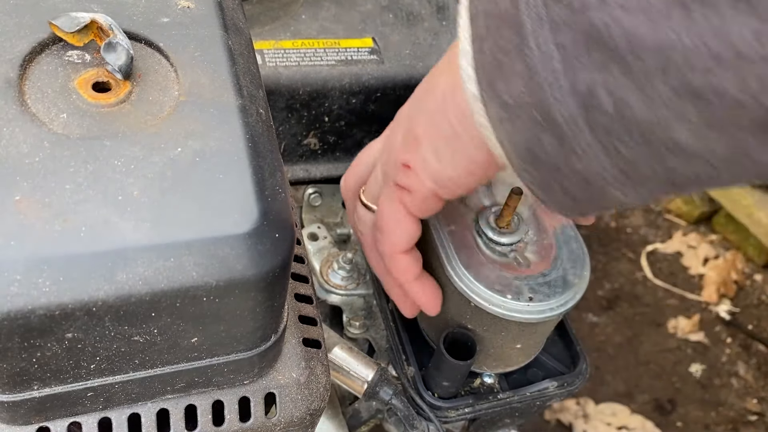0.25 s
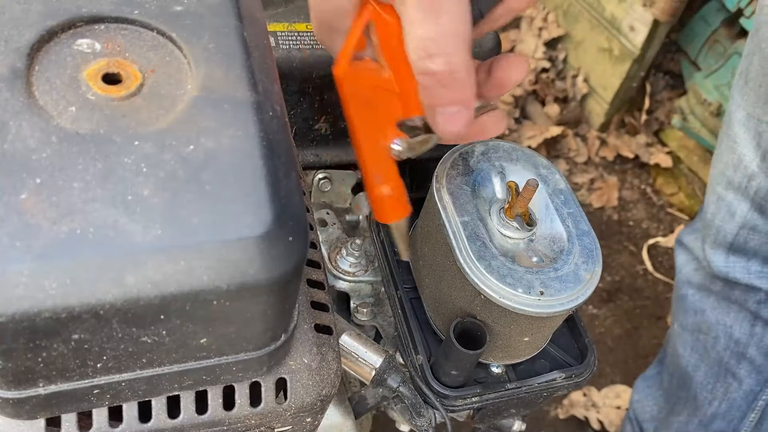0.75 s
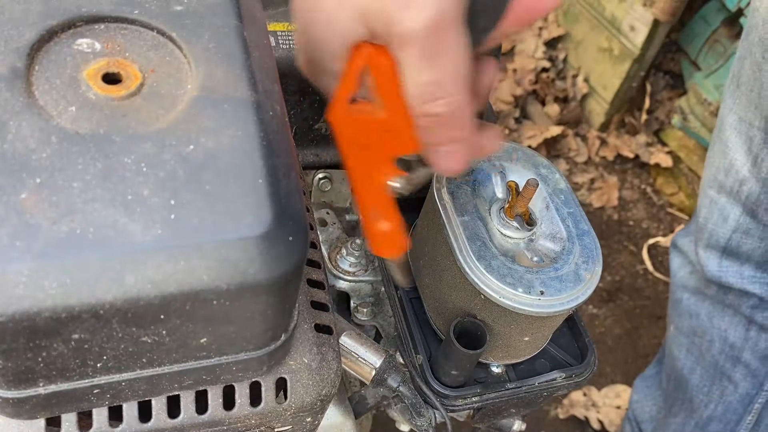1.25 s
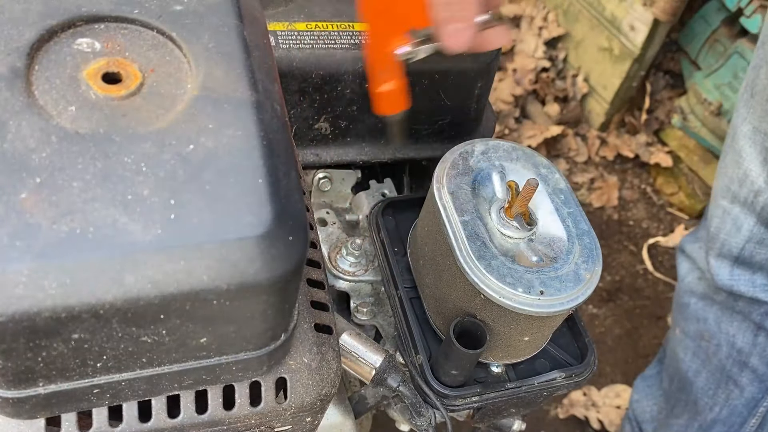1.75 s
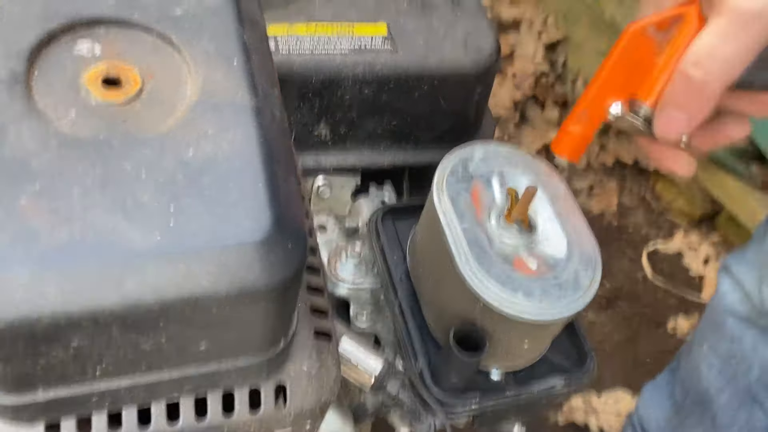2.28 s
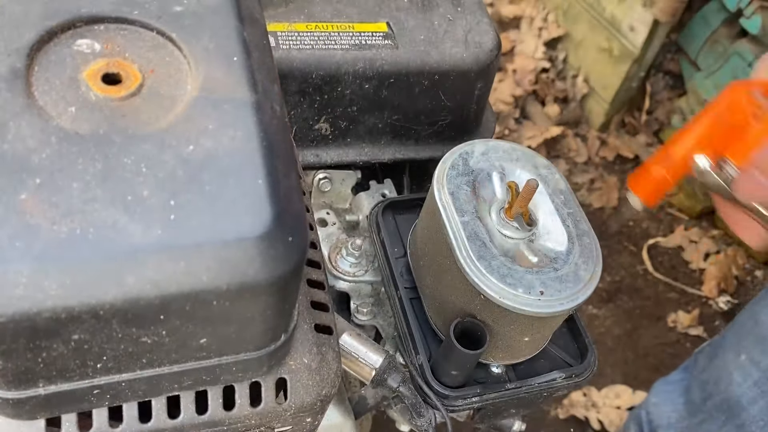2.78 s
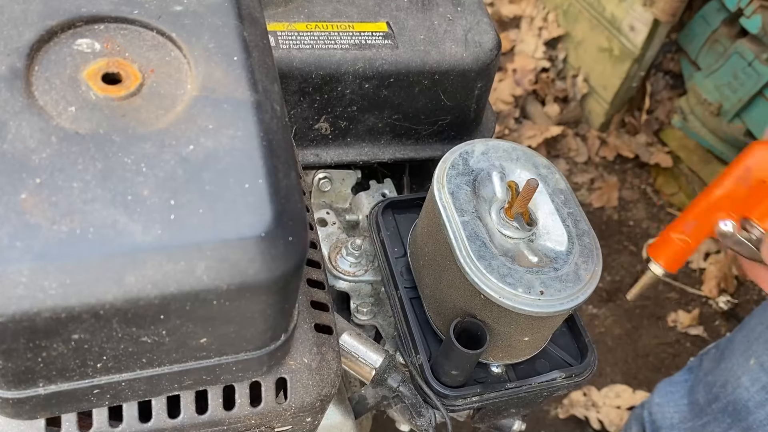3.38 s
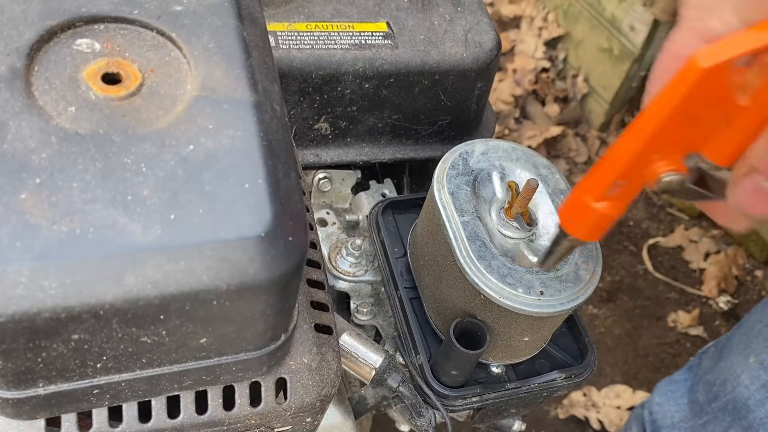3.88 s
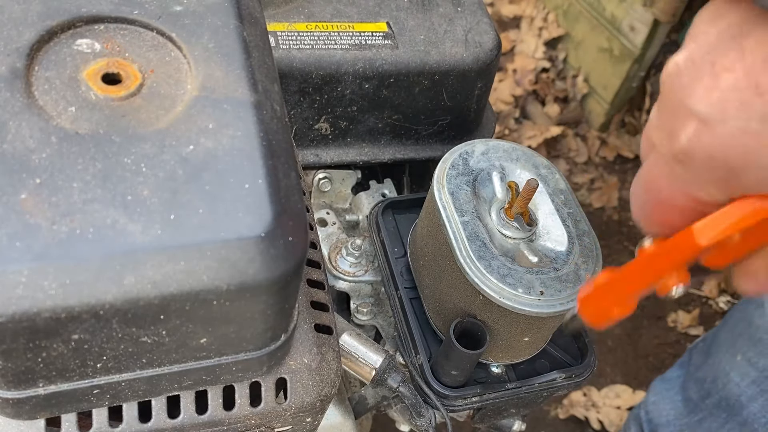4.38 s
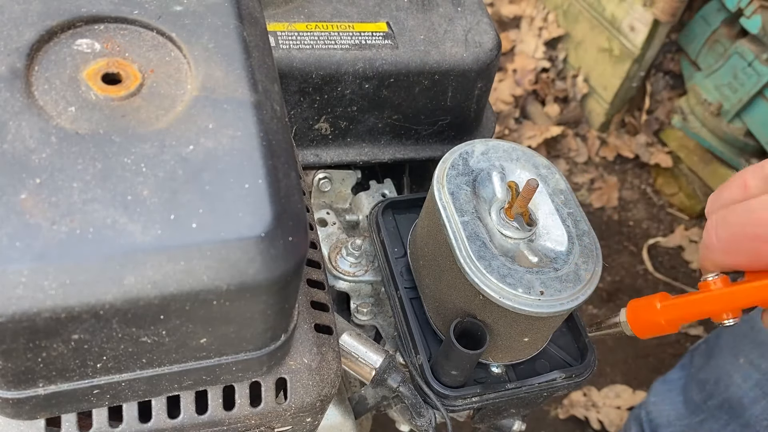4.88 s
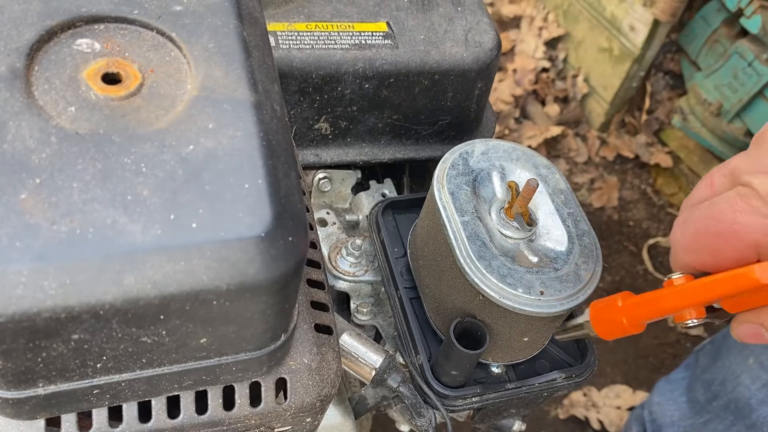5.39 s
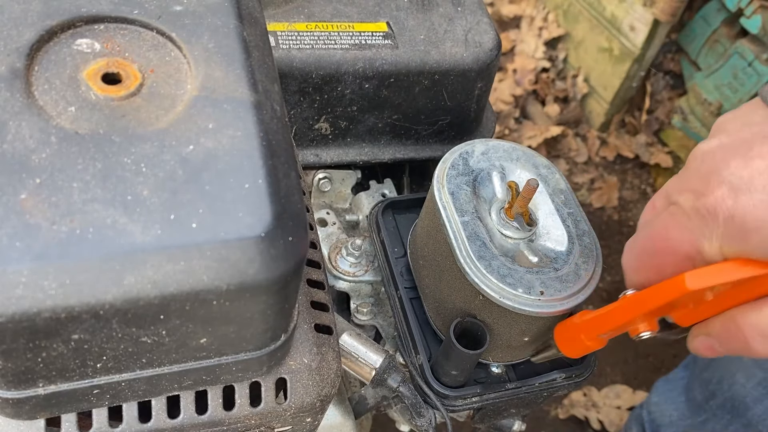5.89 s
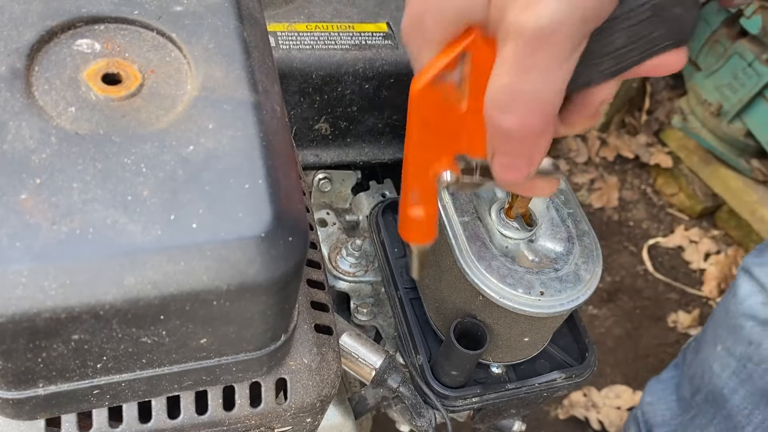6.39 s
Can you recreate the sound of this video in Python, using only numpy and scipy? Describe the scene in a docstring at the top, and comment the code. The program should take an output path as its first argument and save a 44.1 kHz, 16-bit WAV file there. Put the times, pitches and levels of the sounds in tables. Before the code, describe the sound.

Outdoors and very close, cloth brushes the microphone with rumble, low thumps, a finger scrape and small metallic taps. Then a compressed-air blow gun fires twenty-two quick bright blasts about four per second, each starting and stopping abruptly. The hiss shifts in colour as it strikes edges and hollows, with short airy hoots over gaps, faint leaks between bursts and soft puffs of stray air.

```python
"""A compressed-air blow gun, outdoors and close to the microphone, cleans a small engine's air filter
in twenty-two quick blasts: each trigger pull frees a bright noise jet that also roars on metal edges and
in the hollows of the housing. A sleeve first brushes past the microphone with a rustle and a low rumble.
Hand and gun tap, a finger scrapes the lid, gaps hoot under the jet, the valve hisses as it leaks,
and stray air thumps on the microphone. Faint scatter from the engine and the yard, and quiet air, lie behind."""
import sys
import numpy as np
from scipy import signal
from scipy.fft import rfft, irfft
from scipy.io import wavfile

SR = 44100
rng = np.random.default_rng(int(sys.argv[2]) if len(sys.argv) > 2 else 0)


def materialize(psi):
    """Save the field psi as 16-bit PCM at rate SR to the path in sys.argv[1].

    A 1-D psi becomes a single channel; in a 2-D psi each row is a channel.
    """
    bounded = np.clip(np.atleast_2d(psi).T, -1, 1)
    quanta = np.round(bounded * 32767).astype(np.int16)
    wavfile.write(sys.argv[1], SR, quanta)


N = 293265
TIME = np.arange(N) / SR
HZ = np.maximum(np.fft.rfftfreq(N, 1 / SR), 1)   # kept above zero for logarithms


def from_db(db):
    """Decibels to gain."""
    return 10 ** (np.asarray(db) / 20)


def rms_one(x):
    """Scale to unit rms."""
    return x / np.sqrt(np.mean(x ** 2) + 1e-20)


def in_time(rows):
    """Interpolate each column of a table over time; the first column is the time."""
    s, *columns = np.transpose(rows)
    return [np.interp(TIME, s, column) for column in columns]


def swell(middle_s, half_s, order=2):
    """A smooth hump of height 1; a higher order flattens its top."""
    return np.exp(-np.minimum(np.abs((TIME - middle_s) / half_s) ** order, 50))


def butter(x, hz, kind, order=2):
    """Low-pass or high-pass filter."""
    sos = signal.butter(order, min(hz, .45 * SR), kind, fs=SR, output="sos")
    return signal.sosfilt(sos, x)


def drift(rate_hz):
    """A random wander of unit rms, mostly slower than the given rate."""
    return rms_one(irfft(rfft(rng.standard_normal(N)) / (1 + (HZ / rate_hz) ** 2), N))


def white(side_db):
    """Stereo white noise, mostly common to both channels, unit rms."""
    mid, side = rng.standard_normal((2, N))
    return rms_one(mid + from_db(side_db) * side * np.array([[1], [-1]]))


def coloured(spectrum, side_db):
    """Stereo noise shaped by a spectrum table, unit rms."""
    hz, db = np.transpose(spectrum)
    gain = from_db(np.interp(np.log(HZ), np.log(hz), db))
    return rms_one(irfft(rfft(white(side_db)) * gain, N))


def tone_noise(hz, width_hz, size):
    """Turbulence ringing in one resonance, unit rms."""
    off = (np.fft.rfftfreq(size, 1 / SR) - hz) / width_hz
    return rms_one(irfft(rfft(rng.standard_normal(size)) / (1 + 2 * off ** 2), size))


def moving_resonance(x, centre_hz, width_hz, size=128):
    """A broad band-pass whose centre glides, block by block; unit rms."""
    out, state, q = np.zeros_like(x), np.zeros((2, 2)), np.tan(np.pi * width_hz / SR)
    for i in range(0, N, size):
        a = [1 + q, -2 * np.cos(2 * np.pi * centre_hz[i] / SR), 1 - q]
        out[:, i:i + size], state = signal.lfilter([q, 0, -q], a, x[:, i:i + size], zi=state)
    return rms_one(out)


# Quiet outdoor air, relative density per Hz: (pitch_hz, level_db)
AIR_SPECTRUM = [(25, -15), (90, 2), (200, -2.5), (270, 1), (370, -11), (480, -4), (700, -12.5),
                (1200, -18.5), (4000, -25), (15000, -31)]


def ambience(level_db=-74.5):
    """Steady, mostly low noise of the quiet open air."""
    return from_db(level_db) * coloured(AIR_SPECTRUM, side_db=-6.5)


def tail(x, t60_s, cut_hz):
    """Diffuse scatter as decaying low-passed noise, unrelated in the two channels."""
    t = TIME[:SR]
    noise = butter(rng.standard_normal((2, SR)), cut_hz, "low", order=1)
    echo = noise * from_db(-60 * t / t60_s)
    return signal.fftconvolve(x, rms_one(echo) / np.sqrt(SR), axes=1)[:, :N]


def scatter(close):
    """Short scatter from the engine close by, and longer, duller scatter from the yard."""
    engine = from_db(-20) * tail(close, t60_s=0.18, cut_hz=7700)
    yard = from_db(-39) * tail(close, t60_s=.8, cut_hz=2300)
    return engine + yard


# The sleeve sliding by the microphone: (time_s, rustle_db, rumble_db)
SLEEVE_PASS = [(0, -41.5, -25), (0.04, -49, -39), (0.13, -37.5, -34), (0.22, -38, -33.5),
               (0.26, -39.5, -22), (0.335, -51.5, -19.5), (0.385, -53, -44), (0.48, -56, -38.5),
               (0.53, -56, -50)]
# Rustle of cloth, relative density per Hz: (pitch_hz, level_db)
CLOTH_SPECTRUM = [(100, -16), (280, -1), (380, -10), (450, 0), (620, -3.5), (850, -6.5), (1150, -7.5),
                  (1700, -8), (2900, -7.5), (5000, -11.5), (8000, -14), (12000, -16.5), (16000, -26)]
# Rumble of the moving arm, relative density per Hz: (pitch_hz, level_db)
RUMBLE_SPECTRUM = [(20, -17), (40, -7), (58, 1), (85, -3.5), (150, -20.5), (300, -38.5), (1000, -61)]


def sleeve(grain_db=2.0, rumble_gain_db=-1):
    """Cloth fibres catch and slip, and the moving arm stirs a low rumble."""
    rustle_db, rumble_db = in_time(SLEEVE_PASS)
    passing = np.interp(TIME, [.55, .6], [1, 0])
    rustle = from_db(rustle_db + grain_db * drift(206)) * coloured(CLOTH_SPECTRUM, side_db=-5.5)
    rumble = from_db(rumble_db + rumble_gain_db) * coloured(RUMBLE_SPECTRUM, side_db=-12.5)
    return passing * (rustle + rumble)


# Small taps of hand and gun: (start_s, level_db)
TAP_HITS = [(0.298, -33), (0.323, -37), (0.420, -38), (0.495, -45), (3.935, -65), (6.158, -48.5)]
# Resonances each tap rings with: (pitch_hz, level_db, t60_s)
TAP_RESONANCES = [(1897, -11.5, 0.022), (2670, -10, .022), (3060, -2, 0.015), (4700, -3.5, 0.012),
                  (7400, -12, .012), (11100, -7, 0.02)]


def taps(scuff=0.235, scuff_s=0.0016):
    """Each tap is a brief noise scuff and a short ring of damped sines."""
    out, t = np.zeros(N), TIME[:SR // 10]
    for start_s, tap_db in TAP_HITS:
        ring = np.zeros(len(t))
        for hz, level_db, t60_s in TAP_RESONANCES:
            strength = from_db(level_db + rng.normal(0, 2))   # each tap strikes a little differently
            ring += strength * np.sin(2 * np.pi * hz * t) * from_db(-60 * t / t60_s)
        rub = scuff * rng.standard_normal(len(t)) * np.exp(-t / scuff_s)
        at = int(start_s * SR)
        out[at:at + len(t)] += from_db(tap_db) * (ring / 2 + rub)
    return out


# A finger scrapes the filter lid: (start_s, decay_s, pitch_hz, width_hz, level_db)
LID_SCRAPES = [(0.0, .025, 1270, 200.7, -37), (0.13, .07, 437, 120, -48), (0.159, .06, 1130, 200, -44.5),
               (0.419, .005, 2830, 1214, -38)]


def scrapes(rise_s=.002):
    """Short rubs that excite one resonance each."""
    out, t = np.zeros(N), TIME[:SR // 3]
    for start_s, decay_s, hz, width_hz, level_db in LID_SCRAPES:
        envelope = np.exp(-t / decay_s) * (1 - np.exp(-t / rise_s))
        at = max(int(start_s * SR), 0)
        out[at:at + len(t)] += from_db(level_db) * tone_noise(hz, width_hz, len(t)) * envelope
    return out


# Puffs and bumps on the microphone: (start_s, level_db, first_pitch_hz, last_pitch_hz, decay_s)
MIC_PUFFS = [(0.003, -28, 121, 52, 0.017), (0.095, -20.5, 150, 60.5, 0.017), (0.242, -5.5, 120, 56, 0.015),
             (0.262, -13, 130, 60, 0.014), (0.292, -11.5, 160, 62, 0.014), (0.31, -10, 110, 60.4, 0.017),
             (0.327, -5.5, 125, 68.4, 0.01), (0.336, -11.5, 190, 99, 0.0076),
             (1.693, -30, 1470, 250, 0.0066), (1.703, -21, 940, 70.2, .015),
             (1.839, -41.5, 546, 64.7, 0.013), (3.528, -45.5, 300, 70, 0.011),
             (4.168, -36.5, 350, 147, 0.0094), (6.014, -34.5, 350, 90.6, 0.0062)]


def after_puffs(delay_s=.023):
    """A soft puff follows every release of the trigger; same columns as MIC_PUFFS."""
    return [(opens + held + delay_s, -54, 300.6, 72, .011) for opens, _, held, *_ in TRIGGER_PULLS]


def puffs(glide_s=0.0032, attack_cycles=.6, buffet=0.11, buffet_s=0.0021):
    """A pressure kick on the microphone: a short buffet and a thump that falls quickly in pitch."""
    out = np.zeros(N)
    for start_s, level_db, first_hz, last_hz, decay_s in [*MIC_PUFFS, *after_puffs()]:
        at = min(int(start_s * SR), N - 1)
        t = TIME[:min(SR // 4, N - at)]
        cycles = last_hz * t + (first_hz - last_hz) * glide_s * (1 - np.exp(-t / glide_s))
        thump = np.sin(2 * np.pi * cycles) * np.exp(-t / decay_s)
        noise = rms_one(butter(rng.standard_normal(len(t)), 2 * first_hz, "low"))
        gust = buffet * noise * np.exp(-t / buffet_s)
        attack = 1 - np.exp(-t * first_hz / attack_cycles)
        out[at:at + len(t)] += from_db(level_db) * (thump + gust) * attack
    return out


# Rumble of air on the microphone, relative density per Hz: (pitch_hz, level_db)
DRAUGHT_SPECTRUM = [(20, -13.5), (50, -0.5), (120, -3.5), (200, -3.5), (400, -9.5), (1000, -38)]


def draught(flow, lag_s=0.038):
    """Spent air reaches the microphone a moment after each blast and rumbles there."""
    draught_db = current_pull()[-1]
    square_gust = from_db(-26) * swell(1.718, .009)   # one gust hits the microphone squarely
    late_flow = np.interp(TIME - lag_s, TIME, flow)
    return (from_db(draught_db) + square_gust) * late_flow * coloured(DRAUGHT_SPECTRUM, side_db=-17.5)


# Trigger pulls, each aimed at another spot; levels before the flow and gains act on them:
# (opens_s, opening_time_constant_s, held_s, closing_time_constant_s, jet_db, jet_centre_hz, edge_db,
#  edge_change_over_blast_db, hollow_db, hollow_opening_change_db, hollow_closing_change_db, draught_db)
TRIGGER_PULLS = [(0.562, 0.00037, 0.064, 0.0055, -21.5, 10550.0, -25.6, 0, -34.5, 2.5, 5, -50.5),
                 (0.741, 0.0043, 0.177, 0.0065, -20, 7920.0, -21, -5.5, -40.5, 11.5, 14, -54.5),
                 (0.97, 0.0065, 0.15, 0.004, -17, 9030.0, -25.5, 3.5, -43, 11.5, 6.5, -50.0),
                 (1.186, 0.0064, 0.17, 0.012, -17.5, 8580.0, -24, 5, -41.0, 10.5, 5.5, -55.0),
                 (1.419, 0.0074, 0.15, 0.0078, -17, 8350.0, -25, -3.5, -40.5, -5, 8.5, -57.5),
                 (1.661, 0.0026, 0.152, 0.0062, -17.5, 10480.0, -26.5, 12.5, -39.5, 0.5, -8.0, -64),
                 (1.908, 0.0028, 0.17, 0.0053, -18, 10670.0, -27.5, -2, -43, 7.5, 4.5, -72),
                 (2.133, 0.0052, 0.16, 0.0063, -18, 8930.0, -32.2, -3.5, -41, -3.5, -10, -68.0),
                 (2.371, 0.0031, 0.14, 0.0051, -18.5, 10130.0, -30, 4.5, -44.0, -7.5, 5.5, -71.5),
                 (2.625, 0.0097, 0.162, 0.0086, -17.5, 10460.0, -25, 2.5, -40.0, 16.0, 9, -68.0),
                 (2.889, 0.0059, 0.17, 0.0061, -18.5, 10970.0, -22, 2.5, -29, 9.0, -5.5, -67),
                 (3.134, 0.003, 0.14, 0.0037, -18.5, 10320.0, -24.5, -1, -51, 15, -7.0, -67),
                 (3.347, 0.0052, 0.16, 0.0052, -19, 10640.0, -27, 3.5, -41.5, 6, 6.5, -55.5),
                 (3.602, 0.0032, 0.12, 0.0054, -21, 9130.0, -22, 1, -53.5, 22, 20.5, -65),
                 (4.024, 0.0033, 0.14, 0.009, -18, 10970.0, -27.5, -3.5, -49.0, 22, 19.0, -58.0),
                 (4.263, 0.0036, 0.13, 0.0044, -19.5, 11580.0, -26.5, 2.5, -40, 10.5, 7.5, -52.5),
                 (4.795, 0.004, 0.16, 0.004, -18.5, 10830.0, -22.5, 1, -44.5, 15, 6.5, -65.5),
                 (5.072, 0.0065, 0.16, 0.0038, -20.5, 11720.0, -27, 4, -36, -3.5, 1.0, -59),
                 (5.307, 0.0041, 0.19, 0.0038, -20, 10130.0, -23.5, -0.5, -41.5, 7.0, -15, -70),
                 (5.612, 0.0047, 0.16, 0.0044, -16.5, 11240.0, -27, 0.5, -49.5, 13.5, 6.5, -68.0),
                 (5.881, 0.0038, 0.19, 0.0036, -18.5, 9520.0, -23.7, 2, -35, -10.5, 5.0, -59.5),
                 (6.435, 0.0039, 0.186, 0.0059, -17.5, 9850.0, -25.5, -9, -43.5, 11.5, 15, -68)]


def current_pull():
    """The columns of TRIGGER_PULLS over time: each pull holds until halfway to the next."""
    rows = np.array(TRIGGER_PULLS)
    opens, closes = rows[:, 0], rows[:, 0] + rows[:, 2]
    halfway = (closes[:-1] + opens[1:]) / 2
    return rows[np.searchsorted(halfway, TIME)].T


def valve(seat=0.025):
    """The valve lifts off its seat, the flow swells, then dies as the trigger is let go."""
    opens, rise, held, fall, *_ = current_pull()
    lift = (1 + np.tanh((TIME - opens) / (2 * rise))) / 2
    release = (1 + np.tanh((opens + held - TIME) / (2 * fall))) / 2
    return np.maximum(lift - seat, 0) / (1 - seat) * release   # no flow until the lift clears the seat


# Air seeping through the barely open valve until the next blast: (start_s, hiss_db, whistle_db)
VALVE_LEAKS = [(0.719, -43.5, -80), (0.944, -45, -80), (1.144, -50.5, -80), (1.384, -48, -79),
               (2.587, -58.5, -58.5), (2.861, -43, -57), (3.325, -52, -50), (5.283, -55.5, -47.5),
               (5.583, -64.5, -52.5)]
# Resonances of the nozzle tube: (pitch_hz, width_hz, level_db)
NOZZLE_RESONANCES = [(2060, 44, -1), (3030, 350, -9), (3800, 400, -9)]


def seepage(ramp_s=.004):
    """A thin hiss before a blast; sometimes the nozzle tube sings briefly."""
    hiss, whistle = np.zeros((2, N))
    for start_s, hiss_db, whistle_db in VALVE_LEAKS:
        end_s = min(pull[0] for pull in TRIGGER_PULLS if pull[0] > start_s)
        gate = np.clip(np.minimum(TIME - start_s, end_s - TIME) / ramp_s + .5, 0, 1)
        hiss = hiss + from_db(hiss_db) * gate
        whistle = whistle + from_db(whistle_db) * gate
    tube = rms_one(sum(from_db(db) * tone_noise(hz, width, N) for hz, width, db in NOZZLE_RESONANCES))
    thin_air = rms_one(butter(butter(white(side_db=-9.5), 2800, "high"), 11000, "low"))
    return hiss * thin_air + whistle * tube


# The jet sweeps over a gap and sounds it: (middle_s, half_length_s, pitch_hz, width_hz, level_db)
GAP_HOOTS = [(0.595, 0.027, 1430, 400, -28.5), (0.595, .025, 2900, 547, -30),
             (0.795, 0.041, 4740, 999, -24), (0.98, .012, 2860, 600, -21.5), (1.409, 0.012, 3300, 700, -28),
             (1.925, .014, 4350, 700, -29.5), (2.019, .025, 2500, 1200, -33.5),
             (2.082, 0.0098, 2255, 900, -26), (2.104, .02, 1200, 1397, -37.5),
             (2.145, .012, 2920, 610, -27.5), (2.237, .025, 2080, 896, -35),
             (2.259, .013, 7370, 1510, -19.5), (2.485, .022, 1370, 300, -35.5),
             (2.905, .025, 1280, 500, -29), (2.905, 0.021, 2370, 600, -35.5),
             (3.151, 0.012, 5520, 1000, -28), (3.261, .009, 6800, 2520, -24),
             (3.665, 0.048, 5660, 407, -29), (3.66, 0.043, 9200, 600, -32), (4.375, .02, 3560, 600, -29.5),
             (4.82, 0.033, 3250, 500, -32), (5.36, 0.067, 12930, 397, -26.5),
             (5.97, .022, 3380, 600, -26.5), (5.99, .02, 5150, 507, -27), (6.61, 0.02, 2720, 500, -26.5)]


def gaps():
    """Each gap hoots only while the jet crosses it: noise ringing in one resonance."""
    out = np.zeros(N)
    for middle_s, half_s, hz, width_hz, level_db in GAP_HOOTS:
        near = np.abs(TIME - middle_s) < 2 * half_s
        crossing = np.exp(-((TIME[near] - middle_s) / half_s) ** 4 / 2)
        out[near] += from_db(level_db) * crossing * tone_noise(hz, width_hz, near.sum())
    return out


# The jet is smothered as it sweeps across the filter: (middle_s, half_length_s, jet_loss_db)
FILTER_SMOTHERS = [(0.75, .048, 2), (1.722, 0.027, 3.5), (1.986, 0.028, 13.5), (2.206, 0.035, 12),
                   (2.905, 0.09, 4), (6.063, 0.023, 11.5)]


def aim(surge_s=0.038, narrowing_s=0.03, smother_edge_share=0.67):
    """Stored pressure surges into each blast; the surfaces change again as the valve narrows."""
    (opens, _, held, _, jet_db, centre_hz, edge_db, change_db,
     hollow_db, opening_db, closing_db, _) = current_pull()
    surge, narrowing = swell(opens, surge_s), swell(opens + held, narrowing_s)
    progress = np.clip((TIME - opens) / held, 0, 1) - .5
    smother_db = sum(db * swell(s, half, order=4) for s, half, db in FILTER_SMOTHERS)
    jet_db = jet_db + 3 * surge - smother_db
    centre_hz = centre_hz + 250 * drift(6)   # the unsteady hand moves the jet's band
    edge_db = edge_db + change_db * progress + 4 * surge + narrowing - smother_edge_share * smother_db
    hollow_db = hollow_db + opening_db * surge + closing_db * narrowing
    return jet_db, centre_hz, edge_db, hollow_db


def free_jet(level_db, centre_hz, width_hz=4500, low_hz=6000):
    """Bright turbulence of the free jet: noise in a broad gliding band, its lows cut."""
    return from_db(level_db) * butter(moving_resonance(white(side_db=-25), centre_hz, width_hz), low_hz, "high")


# Air breaking on metal edges, relative density per Hz: (pitch_hz, level_db)
EDGE_SPECTRUM = [(100, -35), (300, -26.5), (1000, -13.5), (1900, -8.5), (2500, -4.5), (3250, 1), (4100, -4),
                 (5050, -1), (6000, -7), (7200, 1), (8600, -11.5), (10000, -8.5), (15500, -6)]
# Air caught in the housing, relative density per Hz: (pitch_hz, level_db)
HOLLOW_SPECTRUM = [(30, -36), (100, -18), (310, -15.5), (420, -6.5), (610, -7.5), (800, -3.5), (1000, -1),
                   (1250, 1), (1800, -4), (2400, 0), (4000, -16), (8000, -29.5)]


def struck_surfaces(edge_db, hollow_db, splash_db=1.9, edge_gain_db=.5, hollow_gain_db=1.4):
    """Unsteady roar of air on edges and in hollows, with hooting gaps, a little louder at the left."""
    edge_level = from_db(edge_db + edge_gain_db + splash_db * drift(25))
    hollow_level = from_db(hollow_db + hollow_gain_db + splash_db * drift(40))
    edge = edge_level * coloured(EDGE_SPECTRUM, side_db=-7.5)
    hollow = hollow_level * coloured(HOLLOW_SPECTRUM, side_db=-10)
    return (edge + hollow + gaps()) * from_db([[.6], [-.6]])


def glances(x, strength, longest_s, sway, low_hz, count=6):
    """Reflections off the small tank and lid faces comb the treble; their paths change as the nozzle moves."""
    out, bright = x.copy(), butter(x, low_hz, "high")
    for lag_s in np.geomspace(longest_s / 8, longest_s, count):
        late = TIME - lag_s * (1 + sway * drift(0.55))
        reflection = np.array([np.interp(late, TIME, side) for side in bright])
        out += strength * rng.choice([-1, 1]) * reflection
    return out / np.sqrt(1 + count * strength ** 2)


def blow_gun(flow, flutter_db=0.7, jet_power=1.6, surface_power=0.89):
    """Jet noise plus the roar of the struck surfaces; the bright jet fades first when the flow drops."""
    jet_db, centre_hz, edge_db, hollow_db = aim()
    jet = free_jet(jet_db, centre_hz) * flow ** jet_power
    surfaces = struck_surfaces(edge_db, hollow_db) * flow ** surface_power
    air = (jet + surfaces) * from_db(flutter_db * drift(82))
    return glances(air + seepage(), strength=0.27, longest_s=.006, sway=.12, low_hz=1820)


def scene():
    """Gun, taps and scrapes close by with their scatter; sleeve and moving air at the microphone."""
    flow = valve()
    close = blow_gun(flow) + taps() + scrapes()
    at_microphone = sleeve() + puffs() + draught(flow)
    return ambience() + scatter(close) + at_microphone + close


# Lag of the left channel in the treble: (pitch_hz, lag_cycles)
LEFT_TREBLE_LAG = [(0, 0), (7200, 0), (8000, .19), (9050, .5), (10000, .76), (11000, .99), (11400, 1.02),
                   (12200, 1.2), (13200, 1.49), (13600, 1.53), (14300, 1.78), (15100, 2)]


def record(dry):
    """The left treble lags the right, which widens the hiss; a steep low-pass cuts the top."""
    turn = np.exp(-2j * np.pi * np.interp(HZ, *np.transpose(LEFT_TREBLE_LAG)))
    pair = np.array([irfft(rfft(dry[0]) * turn, N), dry[1]])
    top_cut = signal.ellip(12, .1, 80, 15750, fs=SR, output="sos")   # order, ripple dB, stop dB, Hz
    return signal.sosfilt(top_cut, pair)


dry = scene()
out = record(dry)
materialize(out)
```